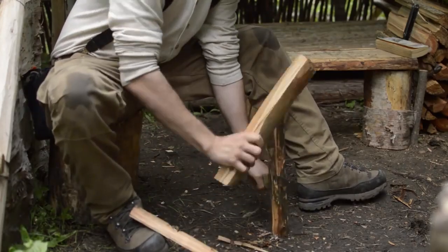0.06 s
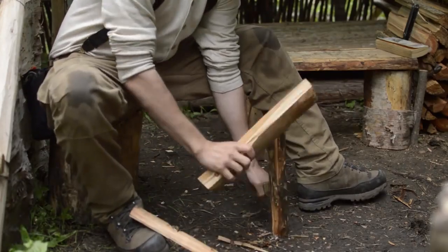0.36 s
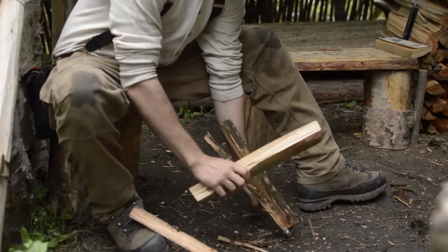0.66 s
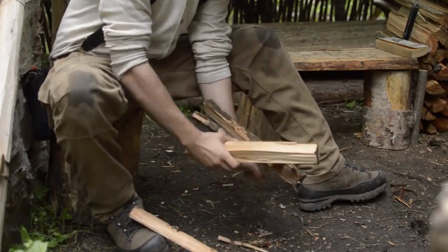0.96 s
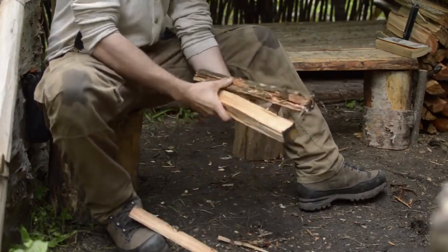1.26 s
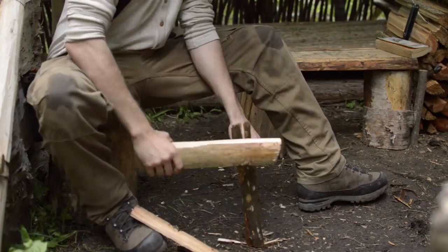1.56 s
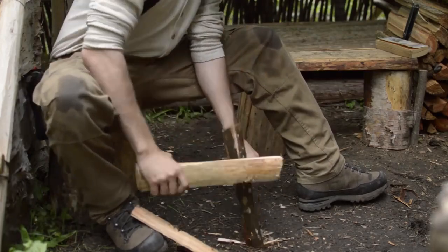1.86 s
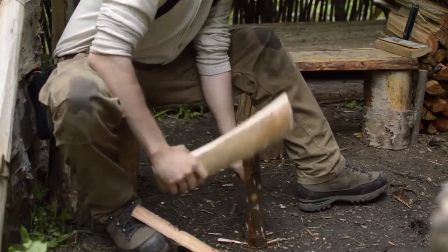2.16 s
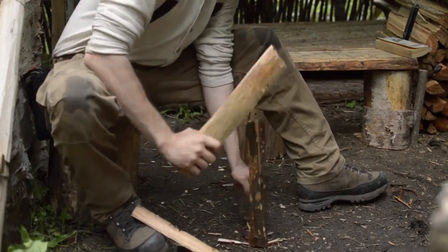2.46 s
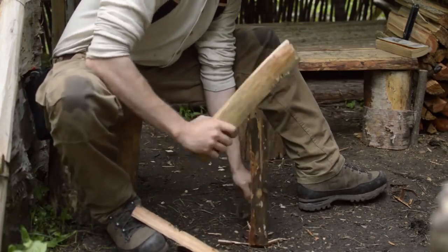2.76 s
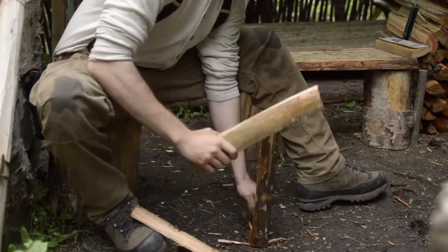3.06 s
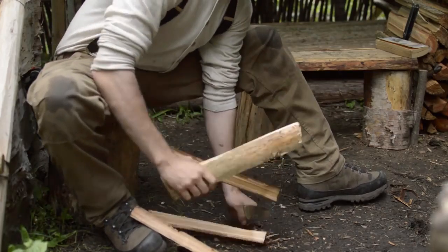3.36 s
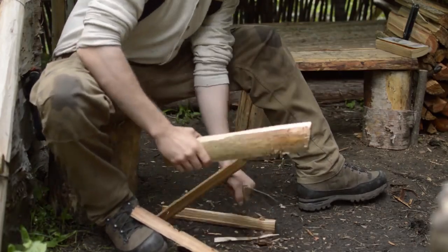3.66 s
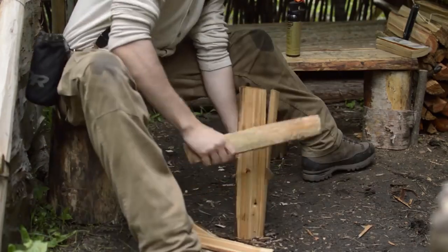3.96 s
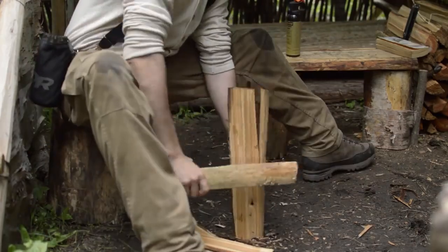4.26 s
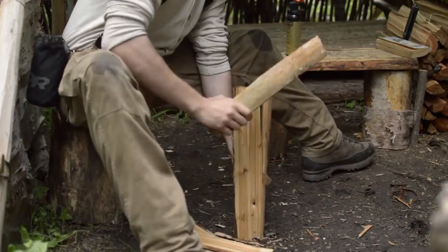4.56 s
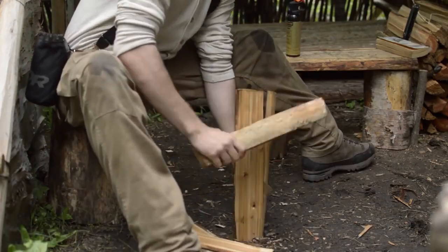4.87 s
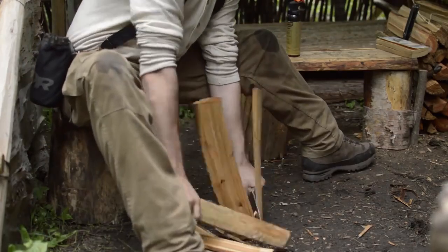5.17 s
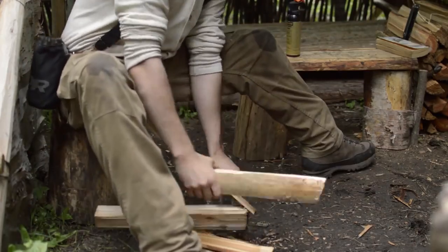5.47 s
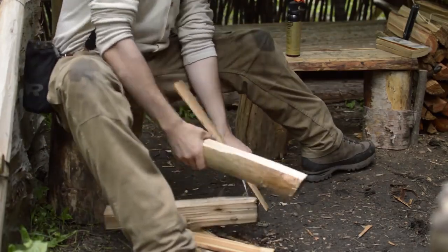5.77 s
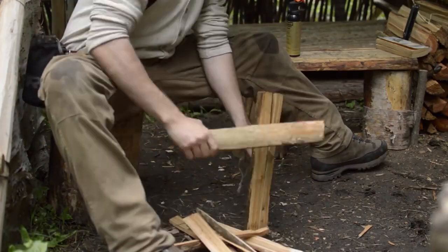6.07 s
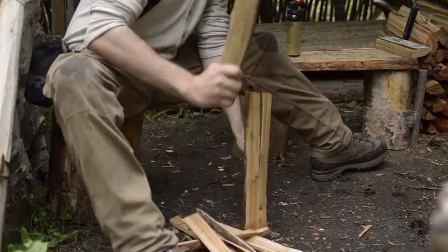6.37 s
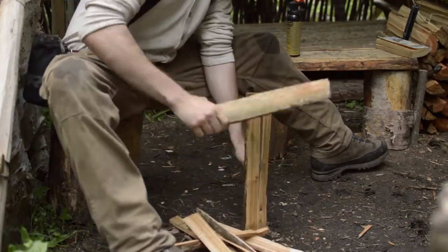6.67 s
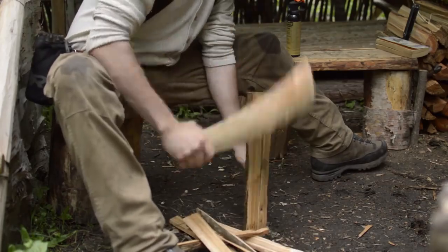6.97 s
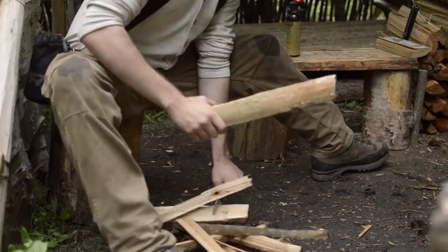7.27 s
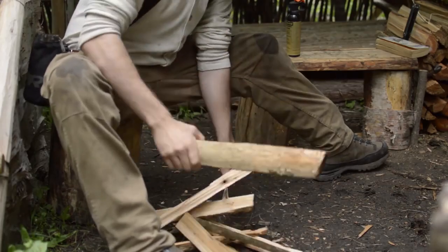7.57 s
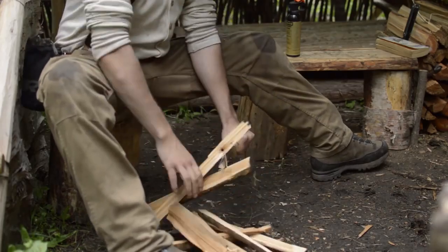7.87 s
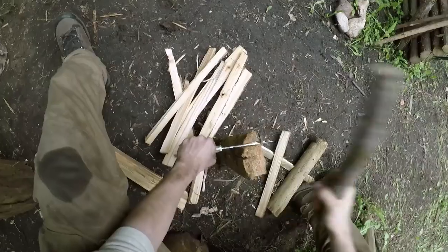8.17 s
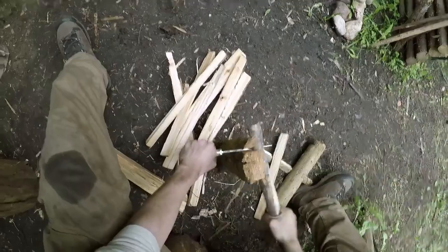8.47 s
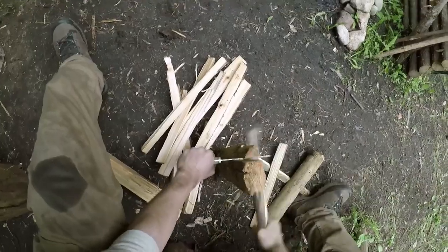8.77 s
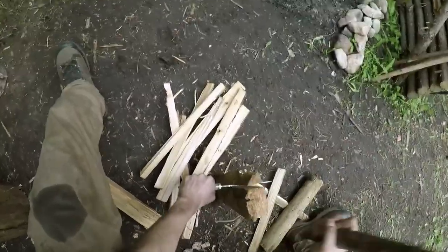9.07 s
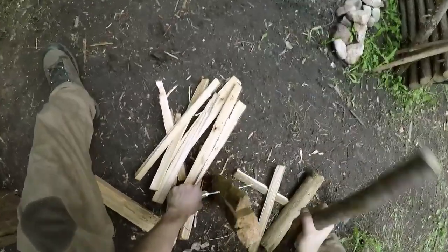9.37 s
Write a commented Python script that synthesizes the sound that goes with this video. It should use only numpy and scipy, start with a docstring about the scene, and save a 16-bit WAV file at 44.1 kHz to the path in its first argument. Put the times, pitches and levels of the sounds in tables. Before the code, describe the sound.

A wooden baton knocks a blade through kindling outdoors, with sharp ringing knocks, cracking wood and clattering pieces, then three duller chops.

```python
"""Kindling is split at a woodland camp, over a soft rustle of leaves. A wooden baton knocks a blade down
through sticks: each impact rings baton, stick and blade, the fibres crack, and the trees answer. Between
blows, pieces rub, thud on the earth and clack on the pile; near 6 s the blade rings on a fresh stick.
From 8.2 s a duller, body-worn microphone hears three last chops into a log, with air buffeting it."""
import sys
import numpy as np
from scipy import signal
from scipy.fft import rfft, irfft, next_fast_len
from scipy.io import wavfile
from scipy.ndimage import map_coordinates

SR = 44100
rng = np.random.default_rng(int(sys.argv[2]) if len(sys.argv) > 2 else 0)


def transcribe(signal):
    """Save signal, clipped to [-1, 1], as a 16-bit WAV file at the path in sys.argv[1]."""
    frames = np.atleast_2d(signal).T
    limited = np.clip(frames, -1, 1)
    pcm = np.round(limited * 32767).astype(np.int16)
    wavfile.write(sys.argv[1], SR, pcm)


N = 414981
NOW = np.arange(N) / SR  # scene time, s
T = np.arange(SR // 5) / SR  # time within one short sound, s
WORN_FROM_S = 8.228

# knocks on the blade (baton blows, and at 6 s the blade set lightly on a stick):
# start_s, knock_db, baton_db, stick_db, blade_db, tip_hz, split_db, split_delay_s
KNOCKS = [(0.2107, -17.5, -26, -26, -41, 2950, -15, 0.0049),
          (0.5476, -18, -23, -17.5, -39, 2950, -23.5, 0.0017),
          (1.6309, -11.5, -21, -21.5, -36, 2950, -23.5, 0.0072),
          (1.965, -19.5, -45, -20.5, -36, 2950, -25, 0.0013),
          (2.2891, -17.5, -41, -27, -41, 2950, -29, 0.0048),
          (2.618, -15, -18, -44.5, -29.5, 2950, -29.5, 0.0061),
          (2.957, -13.5, -9.5, -23, -28.5, 4280, -30, 0.0078),
          (3.2834, -12.5, -10, -24, -28.5, 2950, -22, 0.0087),
          (3.914, -11, -8.5, -7, -18.5, 2950, -28.5, 0.019),
          (4.324, -11, -15, -25.5, -23, 2950, -27.5, .001),
          (4.799, -7.5, -11, -11.5, -10.5, 2950, -17.5, 0.0088),
          (5.211, -10.5, -5, -11.5, -14.5, 2950, -23.5, 0.00038),
          (6.014, -30, -24, -41, -39.5, 2950, -33.5, 0.024),
          (6.5416, -11, -39, -21, -16, 4380, -15, 0.0039), (7.0863, -6, -18, -14, -17, 2950, -11.5, 0.0035)]
# each stick stood under the blade: start_s, pitch_hz
STICKS = [(0, 1593), (1.5, 1633), (3.8, 1545), (5.9, 1672)]
# contact spectrum of wood: frequency_hz, level_db
WOOD_SPECTRUM = [(40, -46), (150, -16), (300, -4.5), (520, -1.5), (800, 3), (1200, -0.5), (1750, -13),
                 (2200, -30), (4000, -22.5), (9000, -38.5), (16000, -59)]
# modes of the struck wood and of the baton: pitch_hz, level_db, t60_s
WOOD_MODES = [(330, -11.5, 0.096), (501.4, -0.5, 0.052), (579.4, -2, 0.043), (682, -6, 0.042),
              (800, -14, 0.011), (1040, -4.5, 0.012), (1170, -13, 0.037)]
BATON_MODES = [(1342, 0, 0.072), (1278, 2, 0.033), (1470, -16.5, 0.044)]

def batoning():
    """Impact excitation: a knock rings wood and blade and drives the stick against the ground."""
    track = np.zeros(N)
    sag_hz_per_s = -61  # the stick rings lower as the split deepens
    average_db = np.mean([row[1] for row in KNOCKS])
    for s, knock_db, baton_db, stick_db, blade_db, tip_hz, _, _ in KNOCKS:
        since, whole_hz = [stick for stick in STICKS if stick[0] <= s][-1]
        stick_hz = whole_hz + sag_hz_per_s * (s - since)
        contact = knock(WOOD_SPECTRUM, chatter_db=0.5, t60=0.055)
        body = burst(contact + amp(-9) * ring(WOOD_MODES, scatter_db=1, detune=0.029))
        treble_db = 0.94 * (knock_db - average_db)  # harder knocks are brighter
        body = burst(colour(body, [(450, 0), (1100, treble_db)]))
        stick = ring([(stick_hz, 0, 0.05), (stick_hz * 1.12, -9, 0.04)], scatter_db=1.5, detune=0.002)
        baton = ring(BATON_MODES, scatter_db=1.5, detune=0.003)
        ringing = amp(baton_db) * baton + amp(stick_db) * stick + amp(blade_db) * blade_clank(tip_hz)
        ground = amp(-17) * thud(118, cycles=14, rise_s=0.0036)
        add(track, s, in_camp(amp(knock_db) * (body + ground), echo_db=-27.5, near_db=-18.5))
        add(track, s, in_camp(ringing, echo_db=-22, near_db=-18.5))
    return track

# spectrum of the wedged blade: frequency_hz, level_db
BLADE_SPECTRUM = [(300, -39), (2100, -24.5), (2500, -12.5), (2800, 2.5), (3150, 1), (3400, -5.5),
                  (3900, -14.5), (4380, -9), (4900, -20), (9000, -25), (16000, -44)]

def blade_clank(tip_hz):
    """A bar clamped in the middle vibrates on both sides: at the handle and at the free tip."""
    handle_hz = 2950  # main peak of the spectrum
    tip_spectrum = [(hz * tip_hz / handle_hz, db) for hz, db in BLADE_SPECTRUM]
    return burst(sum(knock(side, chatter_db=5.5, t60=0.041) for side in (BLADE_SPECTRUM, tip_spectrum)))

# spectrum of the free blade: frequency_hz, level_db
SHIVER_SPECTRUM = [(300, -29.5), (850, 0.5), (1100, -11), (1350, -2), (1900, -15.5), (2500, -13),
                   (2900, -3.5), (3300, -18), (7000, -14.5), (16000, -33.5)]
# its decay: frequency_hz, t60_s
SHIVER_DECAY = [(800, .6), (2900, .9), (7000, .3)]

def blade_shiver():
    """Free vibration: set lightly on a fresh stick, the blade rings on in a dense cluster of modes."""
    track = np.zeros(N)
    add(track, 6.015, amp(-34.5) * burst(tail(SHIVER_DECAY, SHIVER_SPECTRUM, rise_s=0.004)))
    return track

# small separate cracks and clicks as wood splits, bounces or lands: start_s, level_db, length_s
SMALL_CRACKS = [(1.02, -50.5, .005), (1.181, -49.5, .011), (1.987, -33, .0024), (3.472, -38, 0.0025),
                (5.238, -34, .002), (5.3, -46, .002), (5.467, -45.5, .003), (5.478, -47.5, 0.0033),
                (5.569, -40.5, 0.0059), (5.962, -36, 0.0102), (7.319, -40.5, 0.0036),
                (7.457, -47.5, 0.0036), (7.952, -31.5, .006)]

def splitting():
    """Crack propagation: the edge bites and the split runs on; small cracks and clicks fall between."""
    track = np.zeros(N)
    for s, knock_db, *_, split_db, delay_s in KNOCKS:
        bite_db = knock_db - 17
        add(track, s, crack(bite_db, jolt_db=bite_db, length_s=0.0052))
        add(track, s + delay_s, crack(split_db, jolt_db=knock_db - 13.5, length_s=0.0035))
    for s, db, length_s in SMALL_CRACKS:
        add(track, s, crack(db, jolt_db=db - 8.5, length_s=length_s))
    return track

# spectra of tearing fibres and of wood springing apart: frequency_hz, level_db
FIBRE_SPECTRUM = [(200, -35.5), (1500, 2.5), (2300, -12.5), (4000, -5), (5500, -6.5), (7800, -0.5),
                  (10000, -5.5), (12500, -14.5), (16000, -33.5)]
JOLT_SPECTRUM = [(100, -34.5), (450, -5), (900, -7.5), (1150, 0.5), (1330, -9.5), (1700, -1), (2200, -12),
                 (3200, -14), (6000, -20.5), (16000, -37.5)]

def crack(tear_db, jolt_db, length_s):
    """Brittle fracture: fibres fail in a swarm of unequal clicks and jolt the wood they leave."""
    clicks = rough_noise(spread_db=3.8)
    swarm = clicks * ((T / length_s) * np.exp(-2.5 * T / length_s) + 0.025 * fade(0.14))
    middling_db = -23
    sliver_db = -13.5 - 0.3 * (tear_db - middling_db)  # one sliver stands out more in a small crack
    tear = burst(burst(colour(swarm, FIBRE_SPECTRUM)) + amp(sliver_db) * sliver())
    jolt = burst(colour(swarm, JOLT_SPECTRUM))
    return in_camp(amp(tear_db) * tear + amp(jolt_db) * jolt, echo_db=-18, near_db=-10.5)

def sliver():
    """A tiny damped oscillator: a sliver ticks for 20 cycles at a high pitch of its own."""
    hz = 8000 * np.exp(0.12 * rng.standard_normal())
    return burst(np.sin(2 * np.pi * hz * T) * fade(20 / hz))

# even chops into a short log: start_s
CHOPS = [8.4266, 8.8033, 9.1899]
# modes of the log: pitch_hz, level_db, t60_s
LOG_MODES = [(330, -0.5, 0.023), (818, -7.5, 0.041), (1080, 6.5, 0.012), (1428, -21, 0.018),
             (1925, -11, 0.046), (2285, 2, 0.021), (2550, -1, 0.02), (3540, -1.5, 0.013),
             (4590, -9.5, 0.013), (6200, -16.5, 0.026)]
# spectra of the log's knock and of the falling baton's swish: frequency_hz, level_db
LOG_SPECTRUM = [(40, -25), (150, 7), (400, 7.5), (600, -4), (1300, 0), (3300, -7.5), (4500, -18.5),
                (6500, -17.5), (9000, -35), (16000, -41)]
SWISH_SPECTRUM = [(200, -8), (600, -8), (820, 2), (1100, -18), (3000, -16), (8000, -32), (16000, -55)]

def chopping():
    """Mechanical coupling: the baton swishes down onto a log, and the ground booms under it."""
    ports = np.zeros((2, N))
    chop_db = -22.5
    echo_decay = [(300, 0.59), (2500, 1), (8000, 0.91)]
    echo_spectrum = [(200, -22), (1100, -12.5), (2200, 1), (2800, -5.5), (3600, -0.5), (9000, 0)]
    for s in CHOPS:
        contact = knock(LOG_SPECTRUM, chatter_db=-12, t60=0.034)
        hit = burst(contact + amp(-0.5) * ring(LOG_MODES, scatter_db=3, detune=0.014))
        boom = amp(-27.5) * thud(84, cycles=12, rise_s=0.0054)
        swish = dying_noise(SWISH_SPECTRUM, t60=0.067)[::-1]  # reversed, it swells into the hit
        for port in ports:  # each microphone port hears its own reflections from body and ground
            reflections = amp(-6) * knock(LOG_SPECTRUM, chatter_db=21, t60=0.065)
            echo = signal.fftconvolve(hit * fade(0.009), tail(echo_decay, echo_spectrum, rise_s=0.0045))
            add(port, s - len(T) / SR, amp(chop_db - 23) * swish)
            add(port, s, amp(chop_db) * (hit + reflections) + boom)
            add(port, s, amp(chop_db - 16.5) * echo)
    return ports

# wood landing on earth: start_s, level_db, pitch_hz
FALLS = [(3.372, -40.5, 330), (3.442, -34.5, 298), (3.469, -39, 250), (3.51, -29.5, 185), (3.667, -39, 270),
         (3.698, -31.5, 185), (5.269, -35.5, 150), (5.579, -24, 145), (5.695, -42, 127), (6.013, -25, 126),
         (7.133, -23.5, 110), (7.316, -22, 141), (7.441, -37.5, 144), (7.614, -42.5, 190),
         (7.711, -48.5, 340), (7.842, -21.5, 180)]

def falling():
    """Inelastic impact: a piece thuds on soft earth and hums briefly in its own modes."""
    track = np.zeros(N)
    hum_hz, hum_db_per_octave = 351.5, 21
    for s, db, hz in FALLS:
        spectrum = [(30, -26), (hz * 0.61, 0), (hz * 1.7, -4), (hz * 3, -23), (3000, -42), (14000, -60)]
        contact = knock(spectrum, chatter_db=4, t60=0.06)
        earth = burst(thud(hz, cycles=4.4, rise_s=0.0079) + 1.8 * contact)
        hum_db = 1.5 + hum_db_per_octave * np.log2(hz / hum_hz)  # lower thuds excite the hum less
        hum = ring([(hum_hz, 0, 0.33), (hum_hz * 7.4, -12, 0.08)], scatter_db=4.5, detune=0.005)
        add(track, s, in_camp(amp(db) * (earth + amp(hum_db) * hum), echo_db=-8.5, near_db=-7.5))
        add(track, s, scuff(db - 25))
    return track

# wood touching wood: start_s, baton_db, bend_db, pile_db
CLACKS = [(1.245, -47, -48, -51), (1.392, -49, -62, -58), (3.443, -37.5, -48, -39),
          (3.62, -47.5, -46.5, -46), (3.697, -60, -55, -43), (5.996, -29, -39, -39),
          (7.132, -28.5, -38, -26.5), (7.376, -27.5, -30.5, -55.5), (7.841, -21.5, -26.5, -26.5),
          (7.9363, -19, -49, -10.5), (7.954, -15, -31, -19), (8.018, -41, -45, -38.5),
          (8.079, -41.5, -49.5, -55)]
# bending modes of the loosely held baton, and modes of the pile: pitch_hz, level_db, t60_s
BEND_MODES = [(490, -1, 0.09), (593, 0.5, .04)]
PILE_MODES = [(846, -16.5, 0.13), (1114, -6.5, .06), (1475, -3, 0.025), (1744, -5, 0.029),
              (1880, -12.5, 0.046), (3540, -14.5, 0.025)]

def clacking():
    """Hard contact excites the modes of both bodies: baton and pile ring together."""
    track = np.zeros(N)
    for s, baton_db, bend_db, pile_db in CLACKS:
        baton = amp(baton_db) * ring(BATON_MODES, scatter_db=2.5, detune=0.008)
        bend = amp(bend_db) * ring(BEND_MODES, scatter_db=-1, detune=0.005)
        pile = amp(pile_db) * ring(PILE_MODES, scatter_db=0.5, detune=0.0077)
        add(track, s, in_camp(baton + bend + pile, echo_db=-23, near_db=-7))
        add(track, s, scuff(baton_db - 18.5))
    return track

def scuff(db):
    """Surface fracture: bark crunches where a piece touches down."""
    return crack(db, jolt_db=db + 1, length_s=0.0074)

# wood dragged over wood: start_s, body_db, grit_db, rise_s
SLIDES = [(1.38, -37, -48.5, 0.018), (1.446, -46, -57, 0.051), (5.93, -43, -49, 0.011),
          (7.707, -43.5, -49, 0.013), (8.169, -49.5, -47.5, 0.013)]
# spectrum of rubbed wood: frequency_hz, level_db
RUB_SPECTRUM = [(200, -54), (1100, -6), (1340, 11), (1500, -7), (2000, -31), (2900, -10), (4000, -23),
                (16000, -39)]

def sliding():
    """Friction: rough grain hisses and drives the resonance of the piece."""
    track = np.zeros(N)
    for s, body_db, grit_db, rise_s in SLIDES:
        stroke = rough_noise(spread_db=1.5) * (T / rise_s) * np.exp(-T / rise_s)
        add(track, s, amp(body_db) * burst(colour(stroke, RUB_SPECTRUM)))
        add(track, s, amp(grit_db) * burst(colour(stroke, FIBRE_SPECTRUM)))
    return track

# soft rustling swells (at 7.28 s, the wash after the loud crack): centre_s, peak_db, half_length_s
RUSTLES = [(.05, -60, 0.16), (.62, -54, .13), (1.18, -57, 0.14), (3.5, -62, .15), (5.5, -62, .08),
           (7.28, -55, .09), (8.1, -62, .1)]
# spectrum of the rustle: frequency_hz, level_db
RUSTLE_SPECTRUM = [(300, -20), (1200, 4), (2200, 3.5), (5000, 0), (8000, -2.5), (11000, -6), (16000, -10.5)]

def rustling():
    """Amplitude modulation: a grainy hiss flutters and swells into soft rustles."""
    grit = unit(amp(3 * wobble(500)) * hiss(RUSTLE_SPECTRUM))
    return swells(RUSTLES, rest_db=-62.5) * amp(1.7 * wobble(25)) * grit

def crumbs():
    """Shot noise: bark and slivers tick at random, louder during the rustling swells."""
    track, level = np.zeros(N), swells(RUSTLES, rest_db=-81)
    for when, size in rng.random((170, 2)):
        s = when * WORN_FROM_S
        tick_db = -3 + 13 * size ** 2
        add(track, s, level[int(s * SR)] * amp(tick_db) * sliver())
    return track

# the arm swings back after each chop: centre_s, peak_db, half_length_s
SWINGS = [(8.555, -30.5, 0.02), (8.927, -25, 0.029), (9.295, -37.5, .04)]
# spectra of buffeting air and of the quiet background: frequency_hz, level_db
BUFFET_SPECTRUM = [(12, -20), (30, 8.5), (60, -12), (110, -18.5), (200, -34.5), (500, -59), (2000, -100)]
STILL_SPECTRUM = [(88, -32), (150, -8.5), (230, -10), (244, -9.5), (367, -17.5), (783, -23.5), (2070, -22),
                  (2770, -29.5), (5920, -33), (15600, -50)]

def buffeting():
    """Turbulence: chops and arm swings push air unequally over the two ports, above a quiet floor."""
    puffs = [(s + 0.036, -30.5, 0.031) for s in CHOPS]  # columns as in SWINGS
    flow = swells(puffs + list(SWINGS), rest_db=-49.5)
    shared = hiss(BUFFET_SPECTRUM)
    ports = np.zeros((2, N))
    for port in ports:
        eddies = unit(shared + 3.4 * hiss(BUFFET_SPECTRUM))
        port += flow * eddies + amp(-62.5) * hiss(STILL_SPECTRUM)
    return ports

# spectrum of distant leaves: frequency_hz, level_db
LEAF_SPECTRUM = [(15, -28), (25, -17), (70, 2), (228, -0.5), (290, -2.5), (412, -1), (447, -8), (484, -2),
                 (766, 0), (1760, -8), (2870, -13), (3460, -15.5), (3960, -15.5), (15600, -24.5)]

def leaves():
    """Flow noise: leaves stir far off in a breeze that slowly dies down."""
    return amp(-49 - 0.8031 * NOW + 0.5 * wobble(6.2)) * hiss(LEAF_SPECTRUM)

# spectrum of the echo from the trees: frequency_hz, level_db
TREE_SPECTRUM = [(60, -0.5), (300, -8.5), (700, -1), (1400, -5.5), (2100, -9.5), (2900, -0.5), (4000, -2),
                 (8000, -1), (16000, -5)]
# its decay: frequency_hz, t60_s
TREE_DECAY = [(100, 0.45), (1400, 0.71), (3000, 0.74), (6000, 0.54), (12000, 0.33)]

def in_camp(sound, echo_db, near_db):
    """Scattering: ground and bench reflect the direct sound early, the trees later."""
    attack = sound * fade(0.053)  # the sharp start carries farthest
    heard = amp(echo_db) * signal.fftconvolve(attack, tail(TREE_DECAY, TREE_SPECTRUM, rise_s=0.03))
    scatter = rng.standard_normal(len(T)) * fade(0.14) * (1 - np.exp(-T / 0.0017))
    scatter /= np.linalg.norm(scatter)
    add(heard, 0, amp(near_db) * signal.fftconvolve(sound * fade(0.15), scatter))
    add(heard, 0, sound)
    return heard

def ring(modes, scatter_db, detune):
    """Modal superposition: the place of the blow and the grip vary each mode's strength and pitch."""
    hz, db, t60 = np.transpose(modes)[:, :, None]
    size, shift, phase = rng.standard_normal((3, len(modes), 1))
    waves = np.sin(2 * np.pi * (hz * (1 + detune * shift) * T + phase))
    partials = amp(db + scatter_db * size) * fade(t60) * waves
    return burst(np.sum(partials, 0) * (1 - np.exp(-T / 0.00014)))

def knock(spectrum, chatter_db, t60):
    """An impulse followed by dying chatter of the contact."""
    push = burst(colour(T == 0, spectrum))
    return burst(push + amp(chatter_db) * dying_noise(spectrum, t60))

def thud(hz, cycles, rise_s):
    """Damped oscillation: soft earth swings for a few cycles."""
    return burst(np.sin(2 * np.pi * hz * T) * fade(cycles / hz) * (1 - np.exp(-T / rise_s)))

def tail(decay, spectrum, rise_s):
    """Diffuse decay: noise in which each frequency dies at its own rate."""
    hz, t, bands = signal.stft(rng.standard_normal(SR * 2 // 3), SR, nperseg=256)
    noise = signal.istft(bands * fade(along(decay, hz)[:, None], t), SR, nperseg=256)[1]
    noise *= 1 - np.exp(-np.arange(len(noise)) / SR / rise_s)
    return signal.fftconvolve(noise / np.linalg.norm(noise), colour(T == 0, spectrum))

def dying_noise(spectrum, t60):
    """Coloured noise under an exponential decay."""
    return burst(colour(rng.standard_normal(len(T)) * fade(t60), spectrum))

def rough_noise(spread_db):
    """White noise with a log-normal gain on each sample."""
    return rng.standard_normal(len(T)) * amp(spread_db * rng.standard_normal(len(T)))

def hiss(spectrum):
    """Steady coloured noise of rms 1."""
    m = next_fast_len(N)
    gain = amp(along(spectrum, np.fft.rfftfreq(m, 1 / SR)))
    return unit(irfft(rfft(rng.standard_normal(m)) * gain, m)[:N])

def colour(x, spectrum):
    """Minimum-phase filtering of a short sound: folding the cepstrum makes it causal."""
    m = 2 * len(T)
    cepstrum = irfft(np.log(amp(along(spectrum, np.fft.rfftfreq(m, 1 / SR)))))
    cepstrum[1:m // 2] *= 2
    cepstrum[m // 2 + 1:] = 0
    return irfft(rfft(x, m) * np.exp(rfft(cepstrum)))[:len(T)]

def swells(rows, rest_db):
    """Gain of Gaussian swells added in power to a resting level."""
    power = sum(amp(db) ** 2 * np.exp(-((NOW - s) / half_s) ** 2) for s, db, half_s in rows)
    return np.sqrt(amp(rest_db) ** 2 + power)

def wobble(rate):
    """A smooth random curve, rate knots a second."""
    return map_coordinates(rng.standard_normal(int(N * rate / SR) + 4), [NOW * rate])

def fade(t60, t=T):
    """A decay of 60 dB in t60 seconds."""
    return np.exp(-np.log(1000) * t / t60)

def along(points, hz):
    """(frequency_hz, value) points read on a log axis."""
    frequencies, values = np.transpose(points)
    return np.interp(np.log(hz + 1), np.log(frequencies + 1), values)

def amp(db):
    """Decibels to gain."""
    return 10 ** (np.asarray(db) / 20)

def unit(x):
    """Scaled to rms 1."""
    return x / np.sqrt(np.mean(x ** 2) + 1e-20)

def burst(x):
    """Scaled to the energy of 10 ms at rms 1."""
    return x / np.sqrt(np.sum(x ** 2) / (SR / 100) + 1e-20)

def add(track, s, sound):
    """Superpose a sound on a track at time s."""
    part = track[round(s * SR):][:len(sound)]
    part += sound[:len(part)]

def scene():
    """Superposition: the camp from in front, then from the worn microphone."""
    front = batoning() + blade_shiver() + splitting() + falling() + clacking() + sliding()
    front += crumbs() + leaves() + rustling()
    return np.where(NOW < WORN_FROM_S, front, chopping() + buffeting())

def record(dry):
    """Saturation and band limiting: peaks clip at full scale, then pass a steep low-pass."""
    top_hz = 15800
    clipped = np.clip(dry, -1, 1)
    m = next_fast_len(N + SR // 10)
    low_pass = 1 / (1 + (np.fft.rfftfreq(m, 1 / SR) / top_hz) ** 120)
    return irfft(rfft(clipped, m) * low_pass, m)[:, :N]

dry = scene()
out = record(dry)
transcribe(out)
```